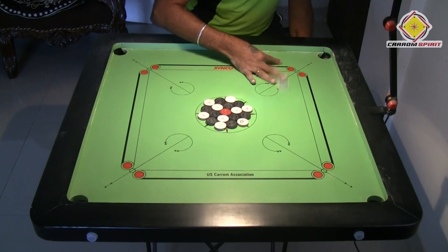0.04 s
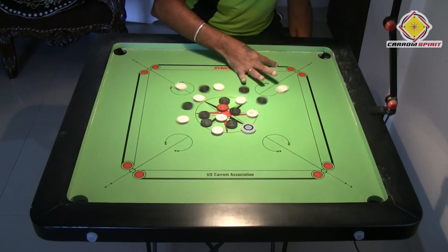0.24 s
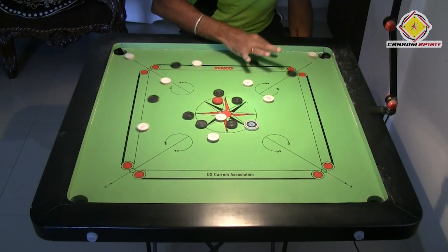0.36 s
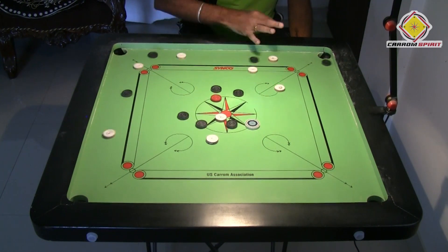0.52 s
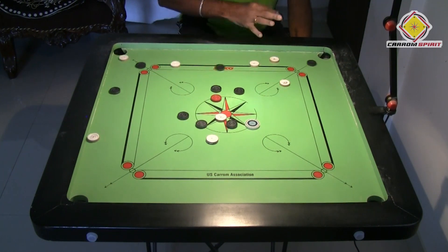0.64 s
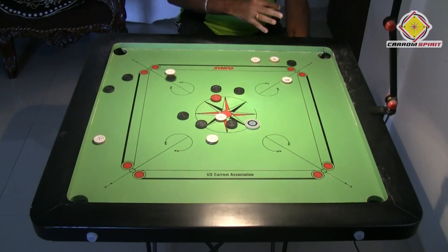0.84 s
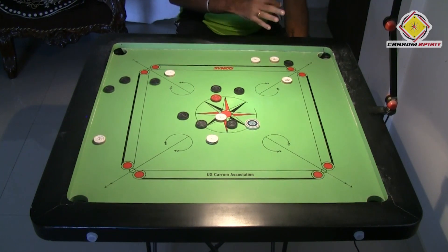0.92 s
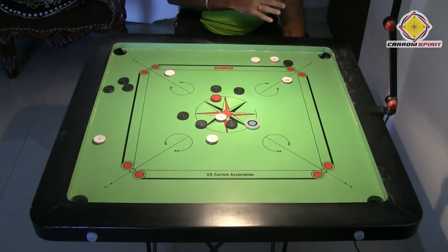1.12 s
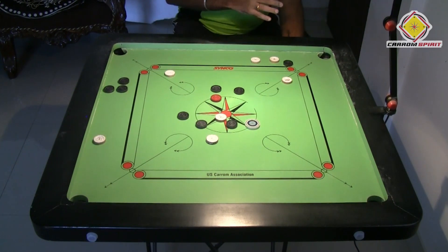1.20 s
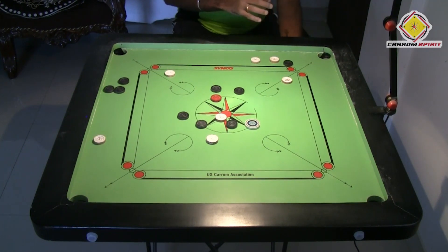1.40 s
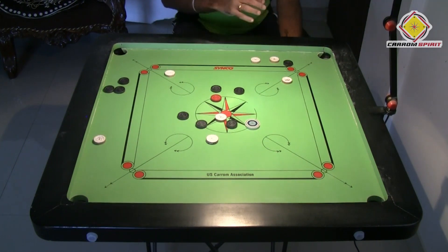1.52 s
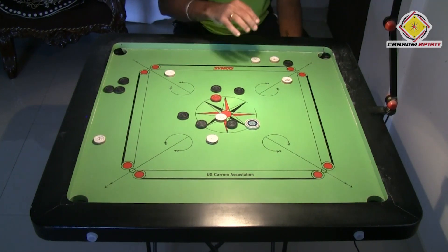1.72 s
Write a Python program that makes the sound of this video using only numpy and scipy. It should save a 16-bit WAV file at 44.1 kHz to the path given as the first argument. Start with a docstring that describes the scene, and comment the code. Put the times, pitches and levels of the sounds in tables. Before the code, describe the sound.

Sharp close crack of a carrom break, then a thinning clatter of sliding wooden discs.

```python
"""Carrom break, close up

At the board's edge in a hard-walled room: a finger flicks the striker with a dull thud, and it cracks
into the packed wooden discs, close enough to overload the microphone. The discs hiss across the bed,
click rim to rim and knock against the frame in a thinning clatter. The board rings and hums under
them, and the room answers each blow."""
import sys
import numpy as np
from scipy import signal
from scipy.fft import rfft, irfft
from scipy.io import wavfile

SR = 44100
rng = np.random.default_rng(int(sys.argv[2]) if len(sys.argv) > 2 else 0)


def put_to_file(sound):
    """Save the sound as 16-bit audio at rate SR, in the file named by the first command-line argument."""
    columns = np.atleast_2d(sound).T  # one column per channel
    safe = np.clip(columns, -1, 1)
    whole_steps = np.round(safe * 32767)
    wavfile.write(sys.argv[1], SR, whole_steps.astype(np.int16))


N = 77175


def amp(db):
    """Decibels to gain."""
    return 10 ** (np.asarray(db) / 20)


def curve(points, hz, column=1):
    """Read a table's column on a log-frequency axis."""
    table = np.array(points, float)
    return np.interp(np.log(np.maximum(hz, 1)), np.log(table[:, 0]), table[:, column])


def fader(points, column=1):
    """Gain over time from a table's column of dB; silent outside it."""
    table = np.array(points, float).T
    return amp(np.interp(np.arange(N) / SR, table[0], table[column], left=-np.inf, right=-np.inf))


def pan(db):
    """Stereo gains; positive dB sits left of the microphone."""
    return amp(np.array([[db], [-db]]) / 2)


def unit(x):
    """Scale to unit energy."""
    return x / np.sqrt(np.sum(x ** 2))


def ring(x, response):
    """Pass a sound through an impulse response."""
    return signal.fftconvolve(np.atleast_2d(x), np.atleast_2d(response), axes=-1)[:, :N]


def add(track, at_s, x):
    """Mix a sound in at a time."""
    start = int(at_s * SR)
    track[..., start:start + x.shape[-1]] += x[..., :N - start]


def contact(shape, size=2048):
    """A causal click with the spectrum shape(Hz) in dB and the energy of 1 ms at full level."""
    cepstrum = irfft(np.log(amp(shape(np.fft.rfftfreq(size, 1 / SR)))))
    cepstrum[1:size // 2] *= 2  # fold to minimum phase
    cepstrum[size // 2 + 1:] = 0
    return unit(irfft(np.exp(rfft(cepstrum)))) * np.sqrt(SR / 1000)


# The room around the microphone: (frequency [Hz], t60 [s], side against mid [dB])
ROOM_BANDS = [(100, .5, -8), (400, .65, -7), (1100, 0.81, -12), (2240, 0.83, -9.5), (4444, 0.47, -5.5),
              (8100, 0.4, -3), (13900, .38, 0)]
def wide_noise(spectrum, size=N):
    """Stereo noise of a given colour, with the room's width: widest in the treble."""
    hz = np.fft.rfftfreq(size, 1 / SR)
    mid, side = rfft(rng.standard_normal((2, size))) * amp(curve(spectrum, hz))
    side = side * amp(curve(ROOM_BANDS, hz, column=2))
    noise = irfft(np.array([mid + side, mid - side]), size)
    return noise / noise.std()


def room_response(size=32768, t60_scale=1, build_s=0.002):
    """Hard walls return a diffuse tail that builds quickly and lasts longest in the middle range."""
    t, hz = np.arange(size) / SR, np.fft.rfftfreq(size, 1 / SR)
    centres, t60s, _ = np.array(ROOM_BANDS).T
    white, tail = rfft(wide_noise([(1, 0)], size)), 0
    for rate, share in zip(np.log(1000) / (t60s * t60_scale), np.eye(len(centres))):
        band = irfft(white * np.interp(hz, centres, share))
        tail = tail + band * np.exp(-rate * t) * np.sqrt(2 * rate / SR)
    return tail * (1 - np.exp(-t / build_s)) * pan(-1.55)


# The still room's background: (frequency [Hz], level [dB])
AIR_SPECTRUM = [(18, -53.5), (30, -29), (117, -14), (170, -1.5), (204, -12.5), (245, -10), (336, -12.5),
                (383, -4.5), (700, -14.5), (777, -12.5), (934, -18.5), (1620, -26), (15900, -52.5)]
def room_air(level_db=-60.5):
    """Faint, low room tone on all sides of the microphone."""
    return wide_noise(AIR_SPECTRUM) * amp(level_db)


# The board's modes, heard from its edge: (frequency [Hz], level [dB], t60 [s])
BOARD_MODES = [(308.5, -5, .45), (444.3, -2, 0.61), (692.6, -9, 1), (784, -4, 0.44), (967, -6.5, .85),
               (1051, -15.5, .6), (1219, -13, 0.66), (1223, -11, 1), (1593, -15, .6), (1632, -13, 0.25),
               (2149, -7, .6), (2430, -12, 0.77), (2820, -11, 0.58), (6160, -8, 0.38)]
def board_ring(blow, level_db=-16.5, size=32768):
    """The plywood bed and its frame ring on after a blow."""
    t = np.arange(size) / SR
    modes = sum(amp(db + level_db) * unit(np.sin(2 * np.pi * hz * t) * np.exp(-np.log(1000) * t / t60))
                for hz, db, t60 in BOARD_MODES)
    return ring(blow, modes) * pan(-2.5)


def through_wood(click, size=3000, bend_hz=1200, bass_delay_s=0.0008, t60_s=0.016):
    """A contact smeared by the board, then the dense, short ring of the wood, different at every spot."""
    t, hz = np.arange(size) / SR, np.fft.rfftfreq(size, 1 / SR)
    envelope = np.exp(-np.log(1000) * t / t60_s) * (1 - np.exp(-t / 0.0018))
    mid, side = rng.standard_normal((2, size)) * envelope
    body = amp(-0.5) * (unit(mid) + amp(-13) * unit(side) * np.array([[1], [-1]]))
    # bending waves carry the bass later than the treble
    bend = irfft(np.exp(-2j * np.pi * bass_delay_s * bend_hz * np.arctan(hz / bend_hz)), size)
    return ring(click, body + bend * (t < t[-1] / 2))


# Finger and striker on the board, close by: (time [s], level [dB])
FLICK_THUDS = [(0.104, -40), (0.122, -34.5), (0.128, -16), (0.139, -24.5), (0.152, -29), (0.166, -27.5)]
# One thud: (frequency [Hz], level [dB])
THUD_SPECTRUM = [(60, -40), (125, -18.5), (200, -25.5), (310, 2.5), (500, 2), (700, -4), (1050, 7),
                 (1500, -13), (2600, -22), (4000, -32.5), (9000, -37), (16000, -41.5)]
def flick(ring_db=-4):
    """The finger lets the striker go with a dull thud."""
    direct = np.zeros((2, N))
    thud = contact(lambda hz: curve(THUD_SPECTRUM, hz))
    for at_s, db in FLICK_THUDS:
        add(direct, at_s, amp(db) * through_wood(thud) * pan(-1.1))
    mono = direct.mean(axis=0)
    return direct + ring(mono, room_response()) + amp(ring_db) * board_ring(mono)


# Sliding, just right of the microphone: (time [s], rush level [dB], hiss level [dB])
SLIDE_LEVELS = [(0.11, -53, -65), (0.13, -42, -56), (0.20, -56, -64.5), (0.25, -19.5, -24.5),
                (0.29, -28.5, -25.5), (0.42, -26.5, -24), (0.55, -42, -36), (0.68, -44.5, -44),
                (0.87, -67, -65), (0.93, -54, -54.5), (1.05, -56, -56), (1.18, -55.5, -78),
                (1.29, -64, -96), (1.37, -84, -105)]
# The woody rush and the hiss above it: (frequency [Hz], level [dB])
RUSH_SPECTRUM = [(200, -34.5), (500, -8.5), (1000, 5), (1700, -2.5), (2600, -11.5), (4000, -29),
                 (16000, -54)]
HISS_SPECTRUM = [(500, -27.5), (2000, 1.5), (3500, -6.5), (5500, -2.5), (8500, -5.5), (11000, -23),
                 (16000, -36)]
def sliding(flutter_db=1, flutter_hz=120):
    """Discs rub unevenly over the powdered board, duller as they slow."""
    uneven = np.interp(np.arange(N) / SR * flutter_hz, np.arange(N), rng.standard_normal(N))
    rush = wide_noise(RUSH_SPECTRUM) * fader(SLIDE_LEVELS)
    hiss = wide_noise(HISS_SPECTRUM) * fader(SLIDE_LEVELS, column=2)
    return (rush + hiss) * amp(flutter_db * uneven) * pan(-2.2)


# The hum, just left of the microphone: (time [s], level [dB])
HUM_LEVELS = [(0.12, -59.5), (0.15, -49), (0.26, -47.5), (0.33, -44.5), (0.40, -37.5), (0.49, -40),
              (0.56, -47.5), (0.65, -50.5), (0.71, -75)]
def board_hum(hz=126.2):
    """The board's lowest mode hums beneath the sliding discs."""
    return np.sqrt(2) * np.sin(2 * np.pi * hz * np.arange(N) / SR) * fader(HUM_LEVELS) * pan(2)


# The break at close range: (frequency [Hz], contact level [dB], level into wood and room [dB])
CRACK_SPECTRUM = [(40, -45, -42), (200, -26, -30.5), (312, -26.5, -7), (600, -15.5, -2.5), (900, 4.5, 4),
                  (2100, 7, 2.5), (3660, -2.5, -5.5), (5795, 6, -1.5), (7300, -17.5, -15.5),
                  (8760, -3, -18.5), (12000, -17.5, -26.5), (16300, -12.5, -27)]
def crack(at_s=0.2166, length_s=0.0048, count=12, first_db=5, fade_db=-17, scatter_db=6):
    """The striker hits the pack: a burst of hard contacts that ring wood and room as one blow."""
    direct, blow = np.zeros((2, N)), np.zeros(N)
    click = contact(lambda hz: curve(CRACK_SPECTRUM, hz))
    body = contact(lambda hz: curve(CRACK_SPECTRUM, hz, column=2))
    for k, (jitter, side, polarity) in enumerate(rng.uniform(-1, 1, (count, 3))):
        progress = (k + jitter / 2 * (k > 0)) / (count - 1)
        gain = np.sign(polarity) * amp(first_db + fade_db * progress)
        add(direct, at_s + progress * length_s, gain * click * pan(scatter_db * side))
    add(direct, at_s + length_s, amp(-3) * through_wood(body))
    add(blow, at_s, body)
    return direct + amp(3) * ring(blow, room_response()) + amp(3.5) * board_ring(blow)


# Disc meets disc out on the bed: (time [s], level [dB], centre [Hz], room send [dB])
RIM_HITS = [(0.2784, -9.5, 8470, -1), (0.296, -27.5, 9580, -4), (0.962, -44.5, 4320, 6),
            (1.0416, -37.5, 5520, 2.5), (1.045, -40.5, 5400, -12), (1.12, -30.5, 7400, -7),
            (1.124, -26.5, 7490, 2.5)]
# One click: (frequency [multiple of centre], level [dB])
RIM_SPECTRUM = [(.1, -41.5), (.45, -25), (.64, -6), (.8, -3), (1, 4.5), (1.18, 0.5), (1.4, -26.5),
                (1.8, -18.5), (2.5, -38.5)]
def rim_clicks():
    """Two rims meet and ring high for an instant."""
    direct, send = np.zeros((2, N)), np.zeros(N)
    for at_s, db, centre_hz, room_db in RIM_HITS:
        spectrum = np.array(RIM_SPECTRUM) * [centre_hz, 1]
        click = amp(db) * contact(lambda hz: curve(spectrum, hz))
        add(direct, at_s, click * pan(-1.5))
        add(send, at_s, click * amp(room_db))
    return direct + ring(send, room_response(t60_scale=0.87))


# Discs on the frame, near the microphone: (time [s], level [dB], treble tilt [dB], send [dB])
FRAME_HITS = [(0.433, -10, 10.5, 2), (0.437, -11.5, 3, 12), (0.441, -12.5, -9, 7.5), (0.455, -12.5, -4, 9),
              (0.468, -11.5, -7, -8), (0.478, -11, 3.5, 8), (0.48, -10.5, 12, 5.5), (0.485, -22.5, -14, 8),
              (0.5035, -14, 6, 7), (0.5047, -9, 11.5, 1), (0.507, -20.5, 4, 10.5), (0.517, -18.5, -2, 8.5),
              (0.525, -18, 6, 5.5), (0.542, -8.5, -1, 3.5), (0.546, -13.5, 10.5, 9.5),
              (0.560, -8, -5.5, 3.5), (0.5757, -6, 5.5, 1.5), (0.581, -23, 16, 8), (0.593, -14.5, 3, 8),
              (0.631, -15, 4.5, 8), (0.635, -13.5, 0, 4.5), (0.648, -22.5, 11.5, -0.5),
              (0.666, -18.5, -21, 6.5), (0.691, -19, 0, 6), (0.734, -23.5, -3.5, 5.5), (0.803, -35, -6, -8),
              (0.812, -28.5, 1, 7.5), (0.926, -36, 2.5, 7.5)]
# One knock: (frequency [Hz], level [dB])
KNOCK_SPECTRUM = [(60, -44.5), (200, -30.5), (330, -19), (500, -7.5), (750, -2.5), (1050, 4.5), (1600, 4.5),
                  (2300, -0.5), (3500, -8), (5200, -9.5), (7000, -19.5), (9500, -31), (12000, -43),
                  (16000, -49.5)]
def frame_knocks(rail_count=4, treble_hz=3030):
    """Discs rebound from the rails; each rail rings the board and has its own path through the room."""
    direct, rails = np.zeros((2, N)), np.zeros((rail_count, N))
    for k, (at_s, db, tilt_db, send_db) in enumerate(FRAME_HITS):
        knock = amp(db) * contact(
            lambda hz: curve(KNOCK_SPECTRUM, hz) + tilt_db * np.log10(1 + (hz / treble_hz) ** 3))
        add(direct, at_s, through_wood(knock) * pan(-1.5))
        add(rails[k % rail_count], at_s, knock * amp(send_db))
    room = sum(ring(rail, room_response()) for rail in rails)
    return direct + room + amp(-5.5) * board_ring(rails.sum(axis=0))


def scene():
    """What reaches the board's edge: the blows, over sliding, hum and room tone."""
    blows = flick() + crack() + frame_knocks() + rim_clicks()
    return blows + sliding() + board_hum() + room_air()


def record(dry, low_cut_hz=95, top_hz=16000):
    """The close stereo microphone clips on the crack; the deep bass and the top are cut."""
    low_cut = signal.butter(1, low_cut_hz, "high", fs=SR, output="sos")
    top_cut = signal.ellip(8, .2, 70, top_hz, fs=SR, output="sos")
    clipped = np.clip(dry, -1, 1)
    return signal.sosfilt(top_cut, signal.sosfilt(low_cut, clipped))


dry = scene()
out = record(dry)
put_to_file(out)
```